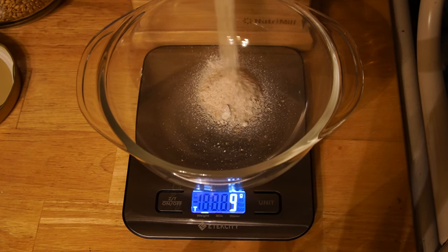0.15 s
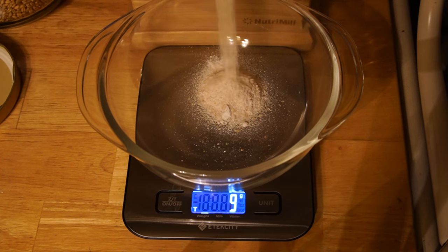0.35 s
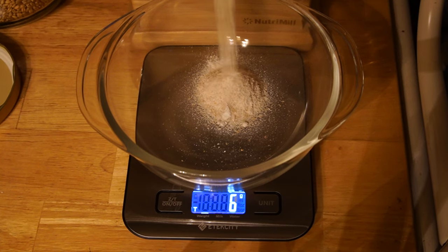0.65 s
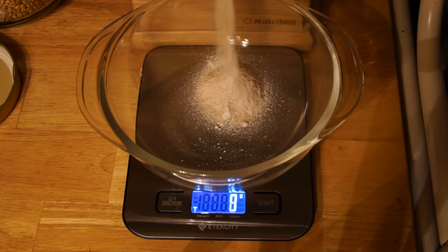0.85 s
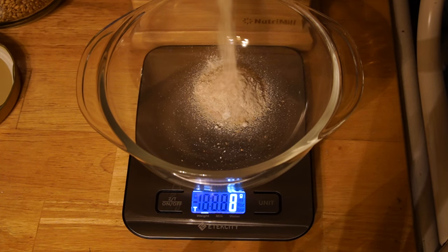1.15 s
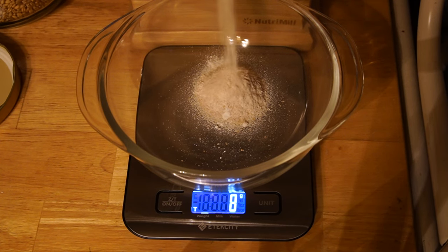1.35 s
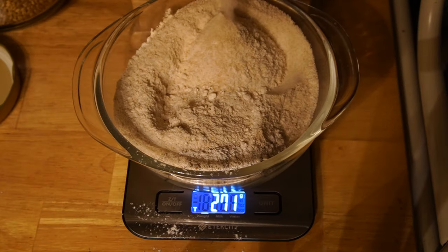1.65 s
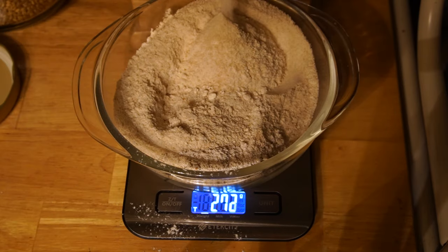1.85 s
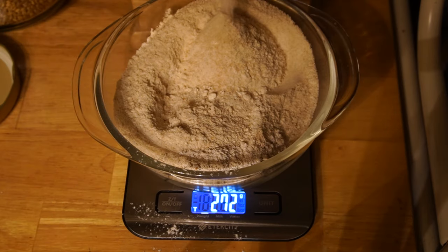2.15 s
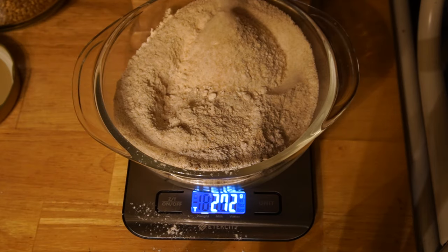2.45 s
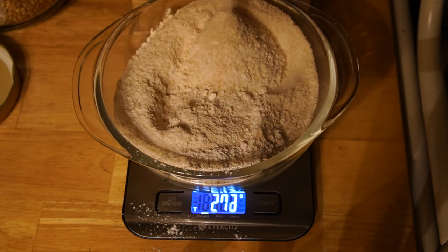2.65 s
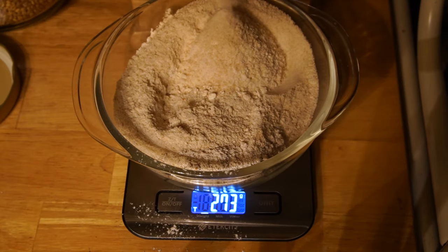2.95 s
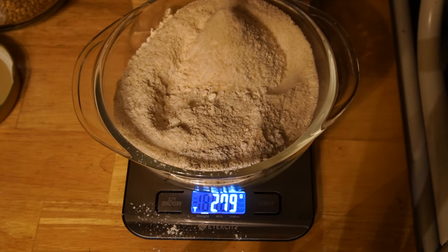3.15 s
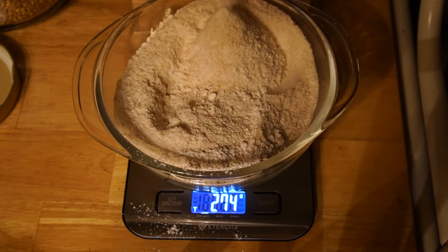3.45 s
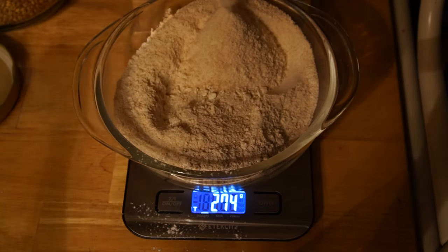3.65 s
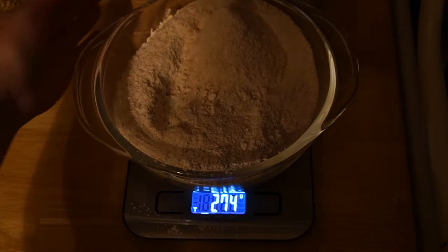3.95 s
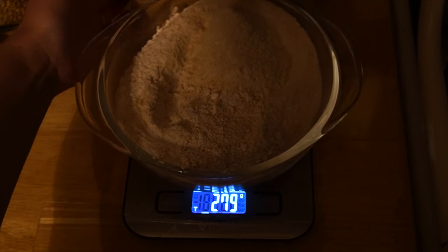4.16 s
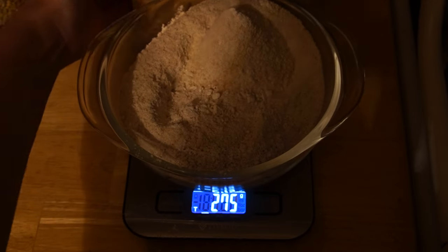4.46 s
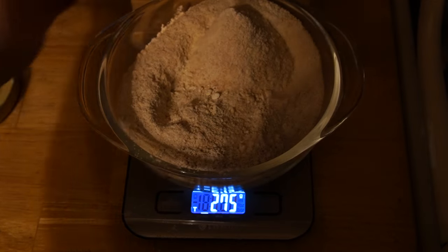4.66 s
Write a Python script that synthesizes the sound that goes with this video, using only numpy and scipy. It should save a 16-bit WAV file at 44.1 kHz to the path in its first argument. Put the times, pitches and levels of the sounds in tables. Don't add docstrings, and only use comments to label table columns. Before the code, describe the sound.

A grain mill runs close by on a wooden counter, first loaded and loud, gritty and uneven, with rapid knocks in the housing. A sudden scene change leaves it nearly empty: scattered cracks and small bursts of grinding over a thin piercing whine and faint hum. Late scratchy rattles of the last kernels flicker over the fading whine before switch-off, a quick ring-out and near silence. Dry, mono.

```python
import sys
import numpy as np
from scipy import signal
from scipy.fft import rfft, irfft
from scipy.io import wavfile
from scipy.ndimage import uniform_filter1d

SR = 44100
rng = np.random.default_rng(int(sys.argv[2]) if len(sys.argv) > 2 else 0)


def makeup_ratio(level_db):
    decades = np.asarray(level_db, float) / 20
    return 10 ** decades


def to_wav(s):
    ch = np.atleast_2d(s).T
    pcm = np.round(np.clip(ch, -1, 1) * 32767)
    wavfile.write(sys.argv[1], SR, pcm.astype(np.int16))


N = 211724
CUT_S, STOP_S = 1.49, 4.622
USUAL_FULL_DB, USUAL_EMPTY_DB = -35, -44
STEEL_LIFTS_S = 0.02

# [f/Hz, density/dB per Hz]
HOUSING_COLOUR = [(290, -37.5), (500, -9.5), (634, -9.5), (696, -0.5), (828, -6), (903, -4), (1250, -8),
                  (1510, -4.5), (2000, -19.5), (2600, -58.5), (4400, -120)]
# [f/Hz, width/Hz, level/dB]
HOUSING_MODES = [(717, 45, -4), (760, 110, -9.5), (889.2, 37, 7.5), (1040, 335, -2.5), (1404, 27, -8.5)]
# [f/Hz, density/dB per Hz]
BASE_COLOUR = [(35, -77), (60, -40), (108, -24), (178, -13), (221, -12), (347, -1), (419, -5.5), (517, -6),
               (560, -18), (650, -9.5), (840, -32), (1430, -120)]
# [f/Hz, width/Hz, level/dB]
BASE_MODES = [(229.4, 28, 1), (284.4, 68, -1), (406.7, 55, 3), (451.6, 12, -0.5), (567.7, 41, 1)]
# [f/Hz, density/dB per Hz]
GRIT_COLOUR = [(1600, -35), (1900, -10.5), (2400, -3), (2900, -3.5), (3200, -12), (4300, -14),
               (5000, -27.5), (6000, -40)]
# [f/Hz, width/Hz, level/dB]
GRIT_MODES = [(2145, 134, 5.5), (2684, 90, -4.5), (3493, 320, -5.5), (4280, 340, -6)]
# [f/Hz, level/dB]
EMPTY_GRIT_EQ = [(1600, 8), (2800, -1), (3200, -10), (4300, -4.5), (5000, -7)]
# [f/Hz, level/dB]
EMPTY_HOUSING_EQ = [(400, -3.5), (1150, 2.5), (1300, -2), (1900, -2.5), (2500, -2.5)]
# [f/Hz, width/Hz, level/dB]
WHINE_FULL_MODES = [(4643, 230, -14.5), (4730, 68, -12)]
# [f/Hz, width/Hz, level/dB]
WHINE_EMPTY_MODES = [(4580, 80, 1.5), (4635, 75, -2), (4695, 50, -7.5), (4805, 60, -14), (5030, 60, -22)]
# [f/Hz, density/dB per Hz]
SCRAPE_COLOUR = [(2800, -21), (3300, -10.5), (4400, -8.5), (4950, -9), (5450, -12), (5900, -15.5),
                 (6900, -19), (7900, -19), (8450, -16), (8720, -13.5), (9500, -23)]
# [f/Hz, width/Hz, level/dB]
SCRAPE_MODES = [(5050, 140, 2), (5345, 55, 0), (5590, 60, -5), (6160, 100, -5), (6470, 150, -5),
                (7380, 380, -5.5)]
# [f/Hz, level/dB]
FULL_SCRAPE_EQ = [(4900, -1), (5350, -3), (5700, 3.5), (7500, -2.5), (8400, 8), (9000, 2)]
# [f/Hz, width/Hz, level/dB]
HISS_MODES = [(9004, 574, -4), (9424, 330, -1.5), (9680, 440, 0), (10080, 290, -21)]
# [f/Hz, width/Hz, level/dB]
SNAP_MODES = [(6470, 260, -2.5), (7440, 420, 4), (9300, 970, -5.5)]
# [f/Hz, width/Hz, level/dB]
CLINK_MODES = [(2250, 740, 2.5), (3750, 260, -10), (4370, 200, -4), (4830, 510, -5.5)]
# [f/Hz, width/Hz, level/dB]
RATTLE_LOW_MODES = [(3660, 270, -5.5), (4250, 370, -10), (4750, 200, 1.5), (5160, 240, 2), (5560, 310, -9)]
# [f/Hz, width/Hz, level/dB]
RATTLE_HIGH_MODES = [(6400, 290, -1), (7530, 390, -0.5), (9230, 810, -2.5)]
# [t/s, peak level/dB, upper modes relative level/dB]
RATTLES = [(3.6213, -55, -2), (3.6315, -58, 2), (3.6424, -52, -16.0), (3.6643, -57, -9),
           (3.6973, -49, -6.0), (3.7313, -62, 6), (3.766, -49, -4), (3.7731, -51, -11), (3.7976, -41, -17),
           (3.81, -49.0, 2.0), (3.822, -56.0, -13.0), (3.8351, -56.0, -13.0), (3.8484, -58.0, -11.0),
           (3.871, -56, -16.0), (3.909, -50.0, 0.5), (3.9191, -59, -7), (3.9261, -58.0, -14.0),
           (3.9876, -67.0, 4.0), (4.0206, -65.0, 9.0), (4.0291, -73, 9.0), (4.0387, -68.0, -4.0),
           (4.072, -68, 12), (4.0897, -65.0, -7.0), (4.146, -62, 3), (4.1755, -68.0, -9),
           (4.1922, -65.0, 0.0), (4.2002, -55, 0), (4.207, -52, -13.0), (4.2171, -61, -8),
           (4.2448, -63, -8.0), (4.2535, -61, -3.0), (4.2766, -52, -6), (4.304, -53, 0), (4.3104, -50, -14),
           (4.353, -50.5, -2), (4.3719, -60, -9.0), (4.383, -66.0, 16), (4.3933, -67.0, 10),
           (4.423, -48.5, -6), (4.4525, -46, -5), (4.4661, -60, 0.0), (4.4749, -67.0, 8.0),
           (4.486, -49, -15.0), (4.5039, -65.0, 5.0), (4.5147, -51, -14.0), (4.5243, -64, -13.0),
           (4.5313, -59, -9.0), (4.5726, -52, -10), (4.5819, -66, -15), (4.6025, -54, -11),
           (4.615, -69, -10)]
# [t/s, peak level/dB, knock f/Hz, clink relative level/dB, snap relative level/dB]
KERNELS_FULL = [(0.0334, -34.5, 890.0, -1, -6.5), (0.099, -20.5, 850, -12, -33),
                (0.1151, -20.5, 1030, -19, -43), (0.1405, -21, 1070, -14, -33.0),
                (0.1468, -20, 930.0, -21, -37), (0.1541, -23.5, 1000, -21.5, -34),
                (0.2114, -29.5, 820.0, -27, -32.5), (0.2371, -25.5, 890, -10, -25.5),
                (0.2441, -22.5, 730, -13.0, -37), (0.2896, -18, 900.0, -13, -23),
                (0.3423, -24, 950, -18, -39.5), (0.3708, -20.5, 970.0, -15, -40.5),
                (0.3838, -19.5, 930.0, -12.5, -20), (0.4188, -22.5, 1040, -24, -34.0),
                (0.4301, -37, 990.0, -4.5, 3.5), (0.4612, -15.0, 940, -14, -20),
                (0.4701, -23.0, 880.0, -29, -35.5), (0.5385, -24.5, 930, -23, -13),
                (0.5533, -21, 950, -27.0, -39), (0.5651, -19.5, 990, -25.0, -35.0),
                (0.5919, -35, 820.0, -27, -38), (0.6846, -25.5, 940.0, -25, -37.0),
                (0.6992, -22, 730.0, -8.5, -24), (0.7109, -26.5, 930.0, -23, -29),
                (0.8123, -21.5, 860.0, -23, -34), (0.8446, -23.0, 900, -29, -25.5),
                (0.94, -17, 860, -14.5, -21.5), (0.9464, -24.0, 600.0, -19, -31.0),
                (1.0066, -20.5, 1040.0, -14.5, -31), (1.0177, -28, 814, -29, -34),
                (1.0607, -21, 770, -14, -18), (1.0811, -24, 720.0, -31.5, -33),
                (1.1829, -27.5, 810.0, -11.0, -15), (1.2607, -25.5, 690.0, -18, -35.5),
                (1.3037, -27.5, 860.0, -10.0, -27.0), (1.3501, -23.0, 870.0, -29, -31),
                (1.3592, -27, 1070, -15.5, -30.0), (1.3806, -26.5, 790.0, -23, -22.5),
                (1.3918, -19, 920, -13.5, -31)]
# [t/s, peak level/dB, knock f/Hz, clink rel. level/dB, snap rel.
# level/dB]
KERNELS_EMPTY = [(1.5782, -21, 950, -26, -28), (1.6128, -31, 980, -12, -25),
                 (1.6198, -25, 970, -30, -39), (1.6274, -24.5, 1030, -29, -39),
                 (1.6342, -27, 1060, -19, -42), (1.7341, -28, 860, -22, -39),
                 (1.7577, -31, 860, -15, -30), (1.8357, -29.5, 790, -11.5, -25),
                 (1.855, -28, 925, -16, -26), (1.8632, -34, 824, -16, -37),
                 (1.9417, -29.5, 675, -14, -32), (2.005, -30, 605, -12, -37),
                 (2.031, -27, 760, -30, -34), (2.1099, -25, 1010, -10, -25),
                 (2.1181, -22, 910, -19, -41), (2.125, -26.5, 900, -15, -29),
                 (2.141, -33, 1000, -23, -17), (2.1655, -24, 1000, -24, -38),
                 (2.2013, -27, 785, -20, -23), (2.2265, -28.5, 960, -19, -19),
                 (2.3216, -30, 960, -30, -26), (2.3358, -32, 850, -29, -25),
                 (2.35, -30.5, 990, -12, -23), (2.4042, -29, 920, -20, -38),
                 (2.445, -31, 1000, -9.5, -31), (2.473, -31, 990, -28, -39),
                 (2.4924, -28, 1050, -10.5, -39), (2.5072, -34, 970, -14, -30),
                 (2.6859, -30, 1060, -13.5, -24), (2.6968, -42, 950, -19, -36),
                    (2.7712, -34, 930, -26, -27), (2.835, -31, 604, -20, -25), (2.8477, -31, 620, -12, -21),
                    (2.8565, -27, 1000, -16, -32), (2.8643, -31, 690, -18, -20),
                    (2.8761, -29.5, 600, -19, -29), (2.924, -44, 870, -3, -3), (2.9505, -29, 620, -15, -23),
                    (3.018, -30, 915, -18, -37), (3.0263, -31, 950, -21, -36), (3.0347, -34, 790, -15, -31),
                    (3.043, -31, 930, -11, -38), (3.077, -32, 940, -28, -35), (3.1805, -30, 840, -19, -38),
                    (3.1912, -31, 1100, -24, -23), (3.199, -39, 600, -5, -16), (3.2077, -27, 900, -24, -33),
                    (3.2142, -23.5, 865, -27, -33), (3.2248, -32, 1130, -20, -18),
                    (3.2494, -29.5, 990, -24, -36), (3.2893, -47, 660, -6, -10),
                    (3.382, -32, 1020, -17, -34), (3.4445, -26, 880, -18, -29),
                    (3.4625, -34, 900, -20, -20), (3.471, -28.5, 940, -17, -32),
                    (3.4861, -33, 820, -25, -27), (3.4938, -37, 1030, -15, -24),
                    (3.5004, -36, 1080, -15, -24), (3.5073, -32.5, 900, -23, -33),
                    (3.5206, -32, 840, -28, -38),
                 (3.6235, -31, 820, -23, -22), (3.6328, -42, 990, -11, -18), (3.6388, -35.5, 1130, -11, -20),
                (3.658, -39, 930, -22, -30), (3.691, -25.5, 980, -24, -36), (3.7275, -32, 965, -31, -25),
                (3.7574, -32, 1040, -30, -31), (3.7985, -22.5, 925, -16, -19),
                (3.8942, -22, 950, -15.5, -44), (3.9163, -27.5, 706, -21, -28),
                (3.989, -25, 1030, -16.5, -35), (4.086, -30, 930, -32, -32), (4.1458, -31.5, 980, -32, -28),
                (4.1616, -32, 970, -21, -37), (4.1926, -33, 1000, -30, -31), (4.2002, -28, 910, -27, -21),
                (4.208, -40, 1030, -30, -12), (4.3016, -28, 1000, -20, -24), (4.349, -34.5, 920, -32, -10),
                (4.3569, -31, 830, -26, -28), (4.3652, -34, 790, -29, -30), (4.3805, -32.5, 870, -13, -17),
                (4.42, -27, 840, -19, -20), (4.4474, -31, 960, -20, -21), (4.4871, -26.5, 910, -28, -29),
                (4.493, -31, 1060, -18, -36), (4.5312, -34, 930, -34, -23), (4.5721, -30, 970, -22, -24),
                (4.6135, -28.5, 940, -23, -36)]
HARD_KERNELS = KERNELS_FULL + KERNELS_EMPTY
# [start t/s, length t/s, load level/dB, coarseness level/dB]
BATCHES_FULL = [(0, 0.057, -34, -9.5), (0.086, 0.25, -34.5, -9.5), (0.336, 0.15, -34, -6),
                (0.525, 0.054, -33.5, -12), (0.676, 0.046, -34.5, -3), (0.765, 0.094, -37.5, -9),
                (0.93, 0.057, -41.5, -3), (0.995, 0.14, -34.5, -4), (1.154, 0.22, -37, -3.5),
                (1.3, 0.23, -39, -5)]
# [start t/s, length t/s, load level/dB, coarseness level/dB]
BATCHES_EMPTYING = [(1.492, 0.1, -40, -5), (1.58, 0.03, -38.5, -6), (1.603, 0.021, -35.5, -8.5),
                    (1.67, 0.13, -43, -8.5), (1.82, 0.078, -41.5, -4), (1.943, 0.065, -43, -1),
                    (2.004, 0.12, -40.5, -6), (2.096, 0.14, -38.5, -6.5), (2.257, 0.072, -47, -3),
                    (2.329, 0.068, -41.5, -12.5), (2.395, 0.13, -41, -4), (2.556, 0.06, -49.5, -7),
                    (2.631, 0.054, -47, -5), (2.679, 0.028, -44, -3.5), (2.753, 0.032, -44, -5.5),
                    (2.818, 0.14, -42.5, -1), (2.984, .03, -44.5, 0), (3.017, 0.06, -37.5, -3.5),
                    (3.102, 0.041, -45.5, -6), (3.165, 0.071, -40, -3), (3.27, 0.056, -44, -10.5),
                    (3.372, 0.044, -45.5, -3.5), (3.438, 0.07, -40.5, -6), (3.62, 0.018, -42.5, -6.5),
                    (3.691, 0.12, -44, -6.5), (3.789, 0.12, -43, -1), (3.907, 0.12, -45.5, -0.5),
                    (4.012, .1, -48.5, -10), (4.138, 0.095, -48, -20), (4.292, 0.019, -45.5, -23),
                    (4.339, 0.11, -44, -7.5), (4.469, .16, -42.5, -5)]
# [t/s, level/dB]
PRESSURE = [(1.44, 4), (1.62, 1.5), (1.78, -1), (2.05, 1.5), (2.3, -1.5), (2.6, -1), (2.85, 1), (3.05, 0),
            (3.35, -1), (3.45, 0), (3.6, -3), (3.8, 1), (4.05, 1), (4.2, -3.5), (4.45, -5.5), (4.62, -12.5)]
PARTS = {"grit": (-42.5, -55, 0.95, 0.54), "ring": (-52, -51, 0.27, 1), "scrape": (-57.5, -67.5, 0.29, 0.4),
         "hiss": (-53, -68, 0.16, .5)}
# [t/s, half length t/s, depth level/dB]
SKIPS = [(1.79, .015, 7), (3.575, 0.032, 4), (3.68, 0.021, 8), (3.75, .012, 9), (3.93, .01, 8),
         (4.01, .01, 7), (4.125, 0.017, 10), (4.205, 0.018, 7), (4.265, 0.019, 3), (4.337, 0.033, 11),
         (4.47, .01, 2), (4.542, 0.02, 6)]
# [t/s, level/dB]
HUM = [
    (0, -84),
    (1.5, -71),
    (4.3, -74),
    (4.45, -75),
    (4.63, -99),
]


def grinding(t, lumps, crush_db, base_db):
    breaking = cracks(1800., spread_db=1.5)
    crush = unit(body(breaking, HOUSING_MODES, HOUSING_COLOUR, order=2))
    base = unit(body(0.45 * breaking + cracks(900., spread_db=3.0), BASE_MODES, BASE_COLOUR, order=2))
    grit = unit(body(0.91 * breaking + cracks(5000., spread_db=2.0), GRIT_MODES, GRIT_COLOUR, order=2))
    grit = np.where(t < CUT_S, grit, body(grit, [], EMPTY_GRIT_EQ))
    crush = np.where(t < CUT_S, crush, body(crush, [], EMPTY_HOUSING_EQ))
    grit_db = np.maximum(part_db("grit", t, crush_db), -66)
    crush_level = makeup_ratio(crush_db + 0.5 + 0.37 * lumps + 1.5 * walk(40))
    base_level = makeup_ratio(base_db + 1.0 + 0.5 * lumps + 0.4 * walk(22))
    grit_level = makeup_ratio(grit_db - 1.5 + 1.08 * lumps + 0.25 * walk(43))
    return (crush * crush_level * fade(t, 0.083)
            + base * base_level * fade(t, 0.23)
            + grit * grit_level * fade(t + STEEL_LIFTS_S, 0.19))


def feed(t):
    attack_s, sag_db_per_s, release_db_per_s = 0.0038, 15, 248.5
    load = makeup_ratio(np.where(t < CUT_S, -36.5, -55.5)) ** 2
    coarse = load * makeup_ratio(-6) ** 2
    for s, length, load_db, coarse_db in BATCHES_FULL + BATCHES_EMPTYING:
        age = np.maximum(t - s, 0)
        sag_db = sag_db_per_s * age + release_db_per_s * np.maximum(age - length, 0)
        same_take = (s < CUT_S) == (t < CUT_S)
        batch = (np.minimum(age / attack_s, 1) * makeup_ratio(load_db - sag_db)) ** 2 * same_take
        load = load + batch
        coarse = coarse + batch * makeup_ratio(coarse_db) ** 2
    return 10 * np.log10(load), 10 * np.log10(coarse)


def jam(t):
    depth, width_s, lead_s = .75, .003, .0015
    coarse_t = t[::32]
    dips = [1 - depth * np.exp(-((coarse_t - s + lead_s) / width_s) ** 2) for s, *_ in HARD_KERNELS]
    return np.prod(dips, axis=0).repeat(32)[:N]


def kernels():
    lead_s, knock_s, length = .003, .001, 1500
    ring_on, ring_on_s = 0.2, 0.0046
    age = np.arange(length) / SR - lead_s
    bell = np.exp(-(age / knock_s) ** 2)
    swell = bell + ring_on * (age > 0) * (1 - bell) * np.exp(-np.abs(age) / ring_on_s)
    crumble = np.exp(np.minimum(age / 0.00079, -age / 0.0047))
    knocks, blows = np.zeros(N + length), np.zeros((3, N + length))
    noises = rng.standard_normal((len(HARD_KERNELS), length))
    for (s, peak_db, hz, clink_db, snap_db), crumbs in zip(HARD_KERNELS, noises):
        late_cut_db = 4 * (s > RATTLES[0][0])
        thump_db = -12 - 0.5 * crumbs[-1]
        blow_db = peak_db + np.array([snap_db - late_cut_db, thump_db, clink_db])
        start = int((s - lead_s) * SR)
        here = slice(start, start + length)
        knocks[here] += makeup_ratio(peak_db + .5) * swell * np.cos(2 * np.pi * hz * age + np.pi * crumbs[0])
        blows[:, here] += makeup_ratio(blow_db)[:, None] * crumbs * crumble
    snap = makeup_ratio(6.0) * body(blows[0], SNAP_MODES, order=2)
    thump = makeup_ratio(13.0) * body(blows[1], [(376.0, 140, 5.5), (270, 100, 1.0)], order=2)
    clink = makeup_ratio(10.5) * body(blows[2], CLINK_MODES, order=1.5)
    return knocks[:N] + snap + thump + clink


def burr(t, lumps, load_db):
    whine_db, scrape_db, hiss_db = (part_db(name, t, load_db) for name in ("ring", "scrape", "hiss"))
    scrape_db = np.maximum(scrape_db, -70)
    skip_db = sum(depth_db * np.exp(-((t - s) / half) ** 4) for s, half, depth_db in SKIPS)
    rub = cracks(8000., spread_db=3.5)
    damped = unit(body(rub, WHINE_FULL_MODES, order=2))
    bare = steady(body(rub, WHINE_EMPTY_MODES, order=2))
    whine = np.where(t < CUT_S - .055, damped, bare)
    scrape = unit(body(rub + 0.22 * cracks(700., spread_db=4.0), SCRAPE_MODES, SCRAPE_COLOUR, order=2))
    packed_eq = [(20, 0.0012)] + FULL_SCRAPE_EQ + [(20000, 0.0011)]
    scrape = np.where(t < CUT_S, body(scrape, [], packed_eq), scrape)
    hiss = unit(body(rub, HISS_MODES, order=3))
    lifted = t + STEEL_LIFTS_S
    return (whine * makeup_ratio(whine_db + 2.5 + 0.14 * lumps + 0.52 * walk(33) - skip_db) * fade(lifted, 0.14)
            + scrape * makeup_ratio(scrape_db + 4.5 + 0.22 * lumps) * fade(lifted, 0.12)
            + hiss * makeup_ratio(hiss_db + 3.5 + 0.65 * lumps) * fade(lifted, 0.079))


def steady(x):
    hold = .4
    swell = uniform_filter1d(unit(x) ** 2, size=200) + .05
    return unit(x / swell ** (hold / 2))


def part_db(name, t, load_db):
    full_db, empty_db, per_load, per_pressure = PARTS[name]
    full = full_db + per_load * (load_db - USUAL_FULL_DB)
    pressure_db = np.interp(t, *np.transpose(PRESSURE))
    empty = empty_db + per_load * (load_db - USUAL_EMPTY_DB) + per_pressure * pressure_db
    return np.where(t < CUT_S, full, empty)


def rattle():
    lead_s, rise_s, decay_s, length = .003, .0007, .0065, 2000
    age = np.arange(length) / SR - lead_s
    bounce = np.exp(np.minimum(age / rise_s, -age / decay_s))
    scuffs = np.zeros((2, N + length))
    noises = rng.standard_normal((len(RATTLES), 2, length))
    for (s, peak_db, high_db), noise in zip(RATTLES, noises):
        at = int((s - lead_s) * SR)
        level = makeup_ratio(peak_db + np.array([[0], [high_db]]))
        scuffs[:, at:at + length] += level * noise * np.abs(noise) * bounce
    low = makeup_ratio(11.0) * body(scuffs[0], RATTLE_LOW_MODES, order=1.5)
    high = makeup_ratio(7.5) * body(scuffs[1], RATTLE_HIGH_MODES, order=1.5)
    return low + high


def motor(t):
    level_db = np.interp(t, *np.transpose(HUM)) + 0.73 * walk(2.4)
    return np.sqrt(2) * makeup_ratio(level_db) * np.sin(2 * np.pi * 120 * t)


def counter_shake(t):
    shake = unit(body(rng.standard_normal(N), [(25, 28, 1.5), (70, 89, -1.5)], order=2))
    return makeup_ratio(-80.0 - 1.1 * t) * shake * fade(t, .6)


def rumble(t):
    return makeup_ratio(-80.5) * unit(body(rng.standard_normal(N), [(140, 150, -0.5), (500, 600, -25)])) * fade(t, 1.7)


def room(x):
    level_db, t60_s, thin_hz, dull_hz = -28, .27, 450., 6000.
    age = np.arange(SR // 2) / SR
    tail = rng.standard_normal(len(age)) * makeup_ratio(-60 * age / t60_s) * (age > .004)
    tail = signal.lfilter(*signal.butter(1, (thin_hz, dull_hz), 'band', fs=SR), tail)
    tail = tail / np.sqrt(np.sum(tail ** 2))
    return x + makeup_ratio(level_db) * signal.fftconvolve(x, tail)[:N]


def fade(t, t60):
    return makeup_ratio(-60 * np.maximum(t - STOP_S, 0) / t60)


def cracks(rate, spread_db):
    hit, size, sign = rng.random((3, N))
    heights = makeup_ratio(-spread_db * np.log(1 - .999 * size))
    return unit((hit < rate / SR) * heights * np.sign(sign - .5))


def walk(rate):
    k = int(SR / rate)
    held = np.repeat(rng.standard_normal(N // k + 1), k)
    return 1.15 * uniform_filter1d(uniform_filter1d(held, k), k)[:N]


def body(x, modes, slope=None, order=1):
    hz = np.maximum(np.fft.rfftfreq(8192, 1 / SR), 1)
    power = 0
    for f, width, db in modes:
        peak = makeup_ratio(db) ** 2 / (1 + (2 * (hz - f) / width) ** 2) ** order
        power = power + peak * (hz / f) ** 2 / (1 + (hz / f) ** 2) * 2
    if slope:
        slope_hz, slope_db = np.transpose(slope)
        power = power + makeup_ratio(np.interp(np.log(hz), np.log(slope_hz), slope_db, left=-70, right=-90)) ** 2
    ceps = irfft(np.log(power + 1e-12) / 2)
    ceps[1:4096] *= 2
    ceps[4097:] = 0
    return signal.fftconvolve(x, irfft(np.exp(rfft(ceps)))[:4096])[:N]


def unit(x):
    return x / np.sqrt(np.mean(x ** 2))


def scene():
    t = np.arange(N) / SR
    lumps = 1.7 * walk(24.69) + 1.2 * walk(90)
    load_db, coarse_db = feed(t)
    ground = grinding(t, lumps, load_db, coarse_db) * jam(t)
    mill = ground + kernels() + burr(t, lumps, load_db) + rattle() + motor(t)
    kitchen = (room(mill) + rumble(t))[None]
    bass_cut = signal.butter(3, 95., 'high', fs=SR, output='sos')
    return signal.sosfilt(bass_cut, kitchen) + counter_shake(t)


def band_limit(x):
    return signal.sosfilt(signal.butter(12, 11340, fs=SR, output="sos"), x)


def record(dry):
    top_cut = signal.ellip(12, .3, 75, 10180, fs=SR, output="sos")
    mix = signal.sosfilt(top_cut, dry)
    return band_limit(mix)


dry = scene()
out = record(dry)
to_wav(out)
```